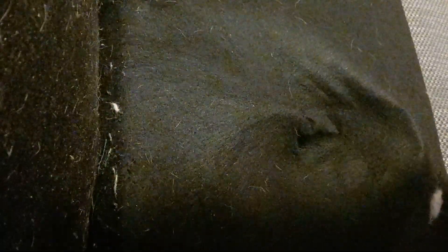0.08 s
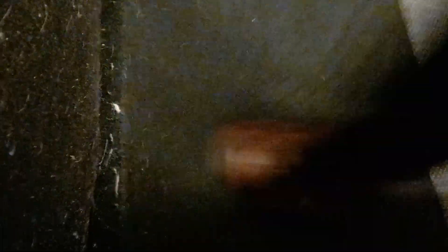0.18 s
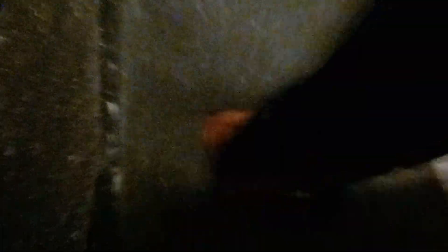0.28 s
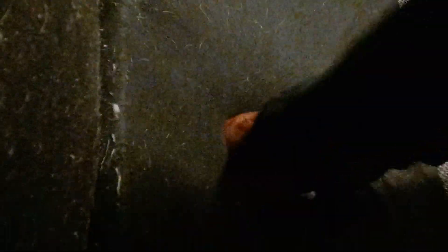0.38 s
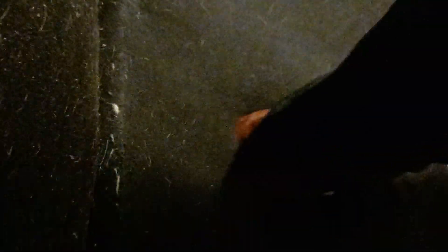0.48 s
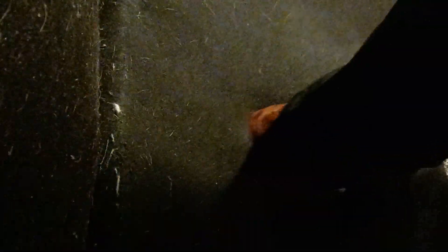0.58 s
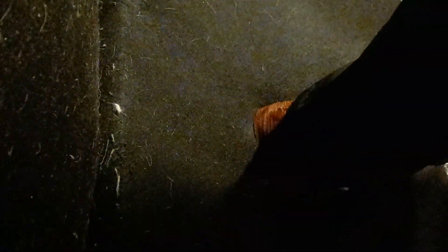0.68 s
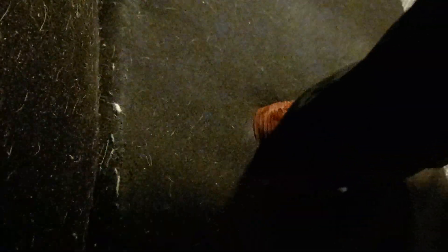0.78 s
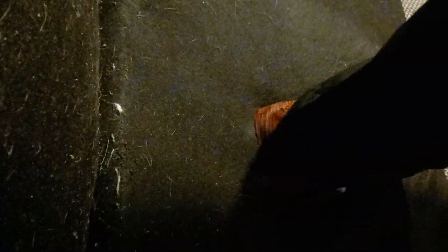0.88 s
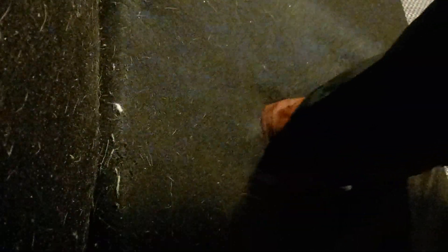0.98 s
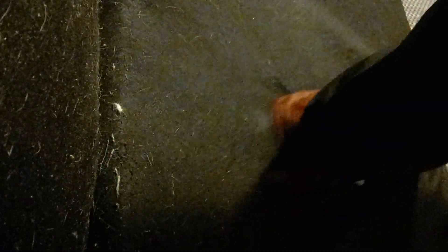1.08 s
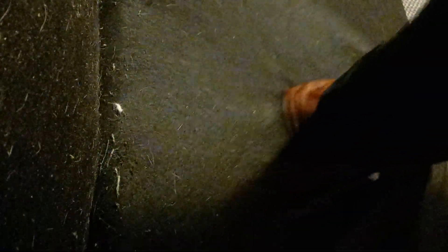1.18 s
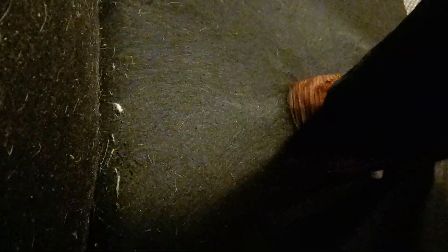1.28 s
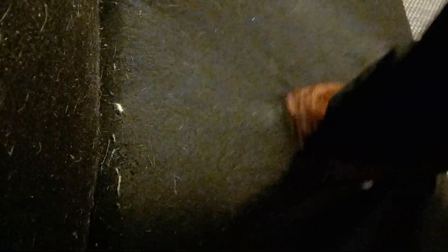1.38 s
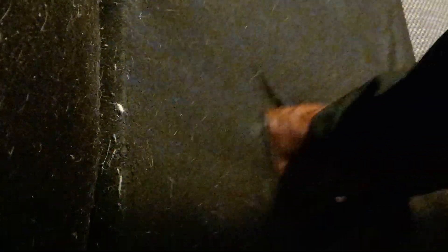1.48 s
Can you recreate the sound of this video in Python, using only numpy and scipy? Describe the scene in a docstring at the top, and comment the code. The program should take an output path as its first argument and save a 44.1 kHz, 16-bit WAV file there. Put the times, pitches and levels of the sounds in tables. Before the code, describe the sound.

A leather shoe stomps once on a sprung cushion, close up in a small room. Soft handling bumps come first; at 0.17 s the sole scrapes, and a loud crunch of knocks and wire snaps peaks around 0.23-0.27 s, with a short frame ring. A low thud follows at 0.3 s. Rustle fades, tiny ticks come near 0.6 s and after 1.15 s, and left-sided hand bumps rumble around 0.7 and 1.0-1.2 s.

```python
"""A leather shoe stomps once on a sprung cushion, close to two microphones in a small room.
The sole scrapes the cover in coarse grains; the springs give damped knocks, crunching grains and snaps
that ring the frame; the cushion bottoms out in low thuds. Cloth rustles in fine grains, with small ticks,
as the foot settles and eases off. The hand holding the microphone bumps and rumbles, mostly on the left,
over quiet room tone made of filtered noise."""
import sys
import numpy as np
from scipy import signal
from scipy.fft import rfft, irfft
from scipy.io import wavfile

SR = 44100
rng = np.random.default_rng(int(sys.argv[2]) if len(sys.argv) > 2 else 0)


def generate_wav(sig):
    """Save sig (samples, or channels by samples) to the path in sys.argv[1] as 16-bit PCM at SR."""
    pcm = np.round(np.clip(np.atleast_2d(sig).T, -1, 1) * 32767).astype(np.int16)
    wavfile.write(sys.argv[1], SR, pcm)


N = 66150
T = np.arange(N) / SR


def amp(db):
    """Decibels to gain."""
    return 10 ** (np.asarray(db) / 20)


def unit(x):
    """Scales to rms 1 over all channels together."""
    return x / np.sqrt(np.mean(x ** 2) + 1e-20)


def level(points):
    """Gain over time, straight lines in dB between (time_s, level_db) points."""
    time_s, level_db = np.transpose(points)
    return amp(np.interp(T, time_s, level_db))


def read(points, hz):
    """Reads (freq_hz, value) points on a log-frequency axis."""
    freq_hz, value = np.transpose(points)
    return np.interp(np.log(hz + 1), np.log(freq_hz + 1), value)


def add(mix, start_s, sound):
    """Mixes a sound in from start_s, cut off at the end of the mix."""
    part = mix[..., round(start_s * SR):][..., :sound.shape[-1]]
    part += sound[..., :part.shape[-1]]


def convolve(x, response):
    """Filters one or two channels."""
    return signal.fftconvolve(np.atleast_2d(x), np.atleast_2d(response), axes=1)[:, :N]


def colour(x, points, size=8192):
    """Minimum-phase filter with the given spectrum, its response scaled to unit energy."""
    hz = abs(np.fft.fftfreq(size, 1 / SR))
    log_gain = np.log(amp(read(points, hz)))
    # the Hilbert transform of the log gain supplies the phase that makes the filter causal
    spectrum = np.exp(np.conj(signal.hilbert(log_gain)))
    response = np.fft.ifft(spectrum).real[:size // 2]
    return convolve(x, response / np.linalg.norm(response))


def grains(per_s, spread_db, apart):
    """Random clicks of uneven size: one stream common to both microphones, one apart for each."""
    size = amp(spread_db * np.minimum(rng.exponential(1, (3, N)), 4))
    sign = rng.choice([-1., 1.], (3, N))
    struck = rng.random((3, N)) < per_s / SR
    clicks = size * sign * struck
    return np.sqrt(1 - apart) * clicks[0] + np.sqrt(apart) * clicks[1:]


def blows(rows):
    """Each blow is a heavily damped swing that swells to its peak and dies away."""
    out, t = np.zeros(N), T[:SR // 8]
    for peak_s, level_db, pitch_hz, swell_s in rows:
        rise_s = 2 * swell_s
        u = t / swell_s
        swell = (u / 2) ** 2 * np.exp(2 - u)  # reaches 1 at rise_s
        swing = np.cos(2 * np.pi * pitch_hz * (t - rise_s))
        add(out, peak_s - rise_s, amp(level_db) * swell * swing)
    return out


def bursts(rows, decay_s):
    """Each snap is a very short burst of decaying noise, partly common to both microphones."""
    out, t = np.zeros((2, N)), T[:SR // 32]
    for start_s, level_db in rows:
        noise = rng.standard_normal((3, len(t)))
        spray = (noise[0] + 1.4 * noise[1:]) * np.exp(-t / decay_s)
        add(out, start_s, amp(level_db) * spray / np.linalg.norm(spray[0]))
    return out


# time the small room takes to fade by 60 dB: freq_hz, t60_s
ROOM_FADE = [(100, 0.66), (400, 0.36), (1000, 0.3), (4000, 0.15), (15000, 0.18)]


def room(x):
    """A short diffuse tail of fading noise, alike on both sides in the bass."""
    noise = rng.standard_normal((3, SR)) * (T[:SR] > .005)  # silent for the first 5 ms
    hz, t, z = signal.stft(noise, SR, nperseg=256)
    apart = (hz / (hz + 1200))[:, None]
    fade = amp(-60 * t / read(ROOM_FADE, hz)[:, None])
    z = (np.sqrt(1 - apart) * z[0] + np.sqrt(apart) * z[1:]) * fade
    tail = signal.istft(z, SR, nperseg=256)[1]
    return convolve(x, tail / np.linalg.norm(tail[0]))


# spectrum of the room tone: freq_hz, relative_db
AIR_SPECTRUM = [(30, 42), (200, -9), (600, 2), (1000, 2), (2000, -3), (4000, -37), (8000, -33), (9000, -49),
                (15500, -45)]


def air():
    """Quiet room tone: steady noise, partly common to both microphones."""
    noise = rng.standard_normal((3, N))
    return amp(-59.5) * unit(colour(noise[0] + 1.8 * noise[1:], AIR_SPECTRUM))


# rumble of the grip at the left microphone: time_s, level_db
NEAR_GRIP_LEVEL = [(0, -33), (0.12, -36.5), (0.2, -34.5), (0.33, -32), (0.42, -33), (0.5, -37),
                   (0.54, -42.5), (0.645, -42), (0.69, -24.5), (0.76, -35.5), (0.88, -34.5), (0.94, -30.5),
                   (1.1, -37), (1.18, -24.5), (1.25, -38), (1.32, -33), (1.5, -36.5)]
# its spectrum: freq_hz, relative_db
NEAR_GRIP_SPECTRUM = [(20, -41), (40, -33.5), (62, 1), (110, 3), (170, -7), (280, -13.5), (450, -22.5),
                      (650, -33), (1000, -41), (3000, -87)]
# rumble of the grip at the right microphone: time_s, level_db
FAR_GRIP_LEVEL = [(0.07, -39), (0.14, -47.5), (0.35, -26.5), (0.5, -42), (0.68, -49.5), (0.9, -43),
                  (1.3, -42.5), (1.5, -47.5)]
# its spectrum: freq_hz, relative_db
FAR_GRIP_SPECTRUM = [(20, -34), (40, -8.5), (65, -5.5), (120, -3), (190, -15.5), (300, -31.5), (600, -28.5),
                     (2000, -67)]
# fingers bumping beside the left microphone: peak_s, level_db, pitch_hz, swell_s
FINGER_BUMPS = [(0.0455, -19, 149, 0.0015), (0.149, -24, 178, 0.0021), (0.4605, -21, 113, 0.0044),
                (0.674, -27.5, 284, 0.0017), (0.687, -33, 453, 0.0023), (0.696, -25.5, 316, 0.0012),
                (0.705, -17, 120, 0.0041), (0.7195, -20, 274, 0.0018), (0.832, -25, 113, .004),
                (0.855, -25.5, 101, 0.0047), (0.864, -26, 278, 0.0016), (0.906, -25.5, 214, 0.0026),
                (0.925, -29.5, 176, 0.0042), (0.953, -28, 220, 0.0019), (0.9962, -16.5, 211, 0.0012),
                (1.012, -20, 121, 0.0027), (1.057, -24, 147, 0.0022), (1.146, -20.5, 150, 0.0066),
                (1.161, -16, 183, 0.0025), (1.1648, -20, 480, 0.0007), (1.171, -14.5, 106, 0.0027),
                (1.196, -23.5, 143, 0.0045), (1.2175, -29.5, 162, 0.0049), (1.366, -28.5, 160, 0.0034),
                (1.443, -26.5, 160, 0.0033), (1.475, -19.5, 132, .002)]


def hand():
    """Low-pitched grains of slipping skin at each microphone; dull damped bumps, faint on the right."""
    near = unit(colour(grains(900, 1.5, 0), NEAR_GRIP_SPECTRUM))[0] * level(NEAR_GRIP_LEVEL)
    far = unit(colour(grains(460, 4.7, 0), FAR_GRIP_SPECTRUM))[0] * level(FAR_GRIP_LEVEL)
    bumps = blows(FINGER_BUMPS) * amp([[0], [-39.5]])  # left, right dB
    return np.array([near, far]) + bumps


# rustle of the trouser leg and the cover, before the left-right tilt: time_s, level_db
RUSTLE_LEVEL = [(0, -52), (0.04, -89), (0.11, -65.5), (0.162, -67), (0.2, -38.5), (0.276, -53.5),
                (0.3, -40.5), (0.33, -40), (0.365, -56), (0.41, -50), (0.46, -64), (0.51, -57),
                (0.585, -56.5), (0.66, -67.5), (0.85, -79), (1.02, -68), (1.2, -62.5), (1.32, -72),
                (1.39, -59), (1.5, -58.5)]
# its spectrum: freq_hz, relative_db
RUSTLE_SPECTRUM = [(100, -23), (700, 6), (1600, -3.5), (2200, -3), (3100, -2), (4800, -2), (6200, -1.5),
                   (7800, -2), (8900, -14), (11000, -17.5), (14000, -15), (16000, -21)]
LEFT_DB = 1  # rustle and ticks: raised on the left, lowered as much on the right


def rustle():
    """Fabric rubbing: dense fine grains, nearly all apart at the two microphones."""
    fine = grains(per_s=9000, spread_db=2, apart=0.99)
    rub = unit(colour(fine, RUSTLE_SPECTRUM)) * level(RUSTLE_LEVEL)
    return rub * amp([[LEFT_DB], [-LEFT_DB]])


# the sole scraping over the cover as it lands: time_s, level_db
SCRAPE_LEVEL = [(0.168, -67), (0.175, -53), (0.195, -40), (0.205, -34.5), (0.213, -37.5), (0.227, -31.5),
                (0.242, -30.5), (0.256, -33), (0.276, -54), (0.3, -77.5)]
# its spectrum: freq_hz, relative_db
SCRAPE_SPECTRUM = [(100, -6), (900, 0.5), (1600, 0.5), (2200, -1), (3100, -6), (4800, 1.5), (6200, -1.5),
                   (7800, 0), (8900, -11), (11000, -13), (14000, -11), (16000, -16.5)]
RIGHT_DELAY_S = .00007  # the shoe is nearer to the left microphone


def scrape():
    """Sole against cover: coarse, uneven grains that reach the right microphone slightly later."""
    coarse = grains(per_s=5000, spread_db=3.5, apart=0.66)
    left, right = unit(colour(coarse, SCRAPE_SPECTRUM)) * level(SCRAPE_LEVEL)
    late_right = np.pad(right, (round(RIGHT_DELAY_S * SR), 0))[:N]
    return np.array([left, late_right])


# springs and frame giving way under the sole: peak_s, level_db, pitch_hz, swell_s
SPRING_KNOCKS = [(0.1765, -31.5, 330, 0.0011), (0.191, -29, 333, 0.0099), (0.2237, -21, 705, 0.0023),
                 (0.2311, -5, 525, 0.00091), (0.241, -10, 274, 0.0034), (0.2505, -9, 428, 0.001),
                 (0.259, -16.5, 288, 0.0032), (0.2676, -6.5, 248.4, 0.0019), (0.2677, -15.5, 889, 0.0014),
                 (0.325, -40.5, 970, 0.0014)]
# force of the crunch, which stirs again as the foot eases off: time_s, level_db
CRUNCH_LEVEL = [(0.168, -76), (0.178, -37.5), (0.195, -33.5), (0.214, -29), (0.23, -15.5), (0.25, -21),
                (0.275, -36.5), (0.295, -65), (0.33, -52), (0.36, -44), (0.42, -48.5), (0.52, -56),
                (0.62, -57), (0.75, -67), (1.33, -64), (1.45, -51.5), (1.5, -56.5)]
# its spectrum: freq_hz, relative_db
CRUNCH_SPECTRUM = [(40, -39), (120, -7.5), (260, 0.5), (650, 1.5), (850, -8.5), (1100, -9.5), (1700, -14.5),
                   (2000, -25.5), (3000, -20), (4200, -27.5), (6000, -45), (15000, -48.5)]
# sharp snaps of wire and cover: start_s, relative_db
WIRE_SNAPS = [(0.1730, -17.5), (0.2252, -1.5), (0.2292, -6.5), (0.2335, -7.5), (0.2395, -7), (0.250, -11.5),
              (0.2658, -27)]
# their spectrum: freq_hz, relative_db
SNAP_SPECTRUM = [(100, -21.5), (500, -4), (1100, 11.5), (1650, 6.5), (2100, -2.5), (2900, 4), (5000, -6.5),
                 (8000, -13), (9000, -25.5), (15500, -17)]
# ring of the springs and frame: pitch_hz, relative_db, t60_s
FRAME_MODES = [(122.04, 2, .5), (219.5, -7, 0.6), (266.3, -3.5, .3), (303, 2.5, 0.12), (371.7, -4, 0.82),
               (466.1, -5.5, 0.37), (536, 0.5, 0.099), (671, 4, 0.17), (796, 2.5, .22), (938, 5, 0.067),
               (1081, -7, 0.21), (1194, -2.5, .12), (1736, -7, .12), (2794, 7, 0.11)]
RING_DB, SPRING_ROOM_DB = -61, -13.5


def springs():
    """Knocks, crunching grains and snaps excite the frame's decaying sine modes and the room."""
    knocks = blows(SPRING_KNOCKS)
    rough = grains(per_s=1300, spread_db=3.5, apart=0.22)
    crunch = unit(colour(rough, CRUNCH_SPECTRUM)) * level(CRUNCH_LEVEL)
    snaps = amp(1.5) * colour(bursts(WIRE_SNAPS, decay_s=0.0011), SNAP_SPECTRUM)
    direct = knocks + crunch + snaps
    modes = np.zeros(N)
    for pitch_hz, relative_db, t60_s in FRAME_MODES:
        modes += amp(relative_db - 60 * T / t60_s) * np.sin(2 * np.pi * pitch_hz * T)
    ring = amp(RING_DB) * convolve(direct, modes)
    return direct + ring + amp(SPRING_ROOM_DB) * room(direct)


# the padding taking the weight, bottoming out and settling, before the left-right tilt:
# peak_s, level_db, pitch_hz, swell_s
PADDING_THUDS = [(0.2025, -26.5, 150, 0.0062), (0.224, -24.5, 106, 0.0027), (0.2865, -16.5, 69.5, 0.0085),
                 (0.2955, -9.5, 113.9, 0.0052), (0.505, -31, 94.4, .004)]


def thud():
    """The cushion bottoms out against the floor: low damped swings, stronger on the left."""
    push = blows(PADDING_THUDS) * amp([[1.5], [-1.5]])  # left, right dB
    return push + amp(-21.5) * room(push)


# small ticks of leather and wire under load: start_s, relative_db
LOAD_TICKS = [(0.5705, -26), (0.5955, -24), (0.705, -42), (0.750, -46.5), (1.156, -36), (1.2985, -30.5),
              (1.3505, -33.5), (1.446, -35)]
# their spectrum: freq_hz, relative_db
TICK_SPECTRUM = [(200, -49), (2300, -23.5), (3100, -2.5), (5000, -10.5), (7800, -5), (9500, -31),
                 (15500, -21)]


def ticks():
    """Leather and wire ticking under load: very short bursts of filtered noise."""
    sharp = amp(-3.5) * colour(bursts(LOAD_TICKS, decay_s=.0018), TICK_SPECTRUM)
    return sharp * amp([[LEFT_DB], [-LEFT_DB]])


def cloth():
    """Scrape, rustle and ticks, close by, with their share of the room."""
    direct = scrape() + rustle() + ticks()
    return direct + amp(-10.5) * room(direct)


def scene():
    """The stomp on springs and padding, the cloth, the hand and the room tone."""
    return springs() + thud() + cloth() + hand() + air()


# difference in colour between the two microphones: freq_hz, left_minus_right_db
MICROPHONE_BALANCE = [(400, 1.5), (1100, -2), (2000, 2.5), (3300, 3), (5500, -2), (8000, 2), (11000, -7.5),
                      (15000, -0.5)]
LOW_CUT_HZ, HIGH_CUT_HZ = 49.2, 15800


def record(dry):
    """The microphones differ a little in colour; the recorder cuts the deep bass and the top treble."""
    hz = np.fft.rfftfreq(2 * N, 1 / SR)
    balance = amp(read(MICROPHONE_BALANCE, hz) * np.array([[.5], [-.5]]))
    low_cut = 1 / np.sqrt(1 + (LOW_CUT_HZ / (hz + 1)) ** 12)
    thinned = irfft(rfft(dry, 2 * N) * balance * low_cut)[:, :N]
    high_cut = signal.firwin(511, HIGH_CUT_HZ, window=("kaiser", 9), fs=SR)
    return signal.oaconvolve(thinned, high_cut[None], "same")


dry = scene()
out = record(dry)
generate_wav(out)
```